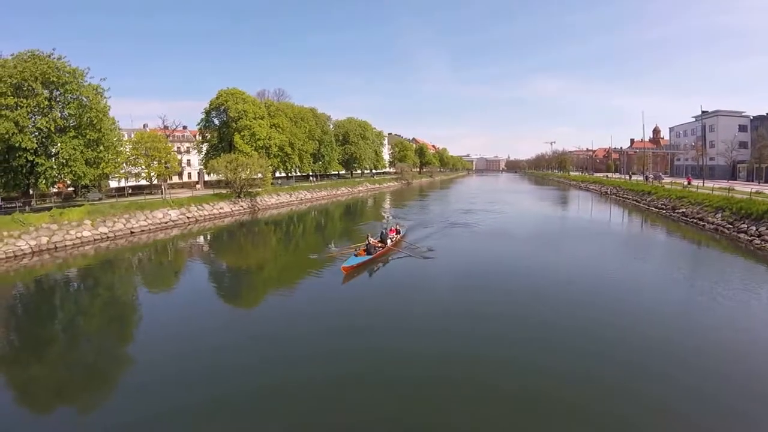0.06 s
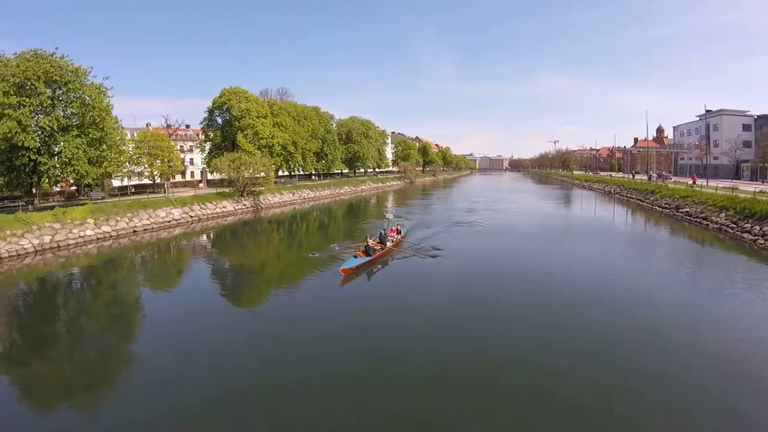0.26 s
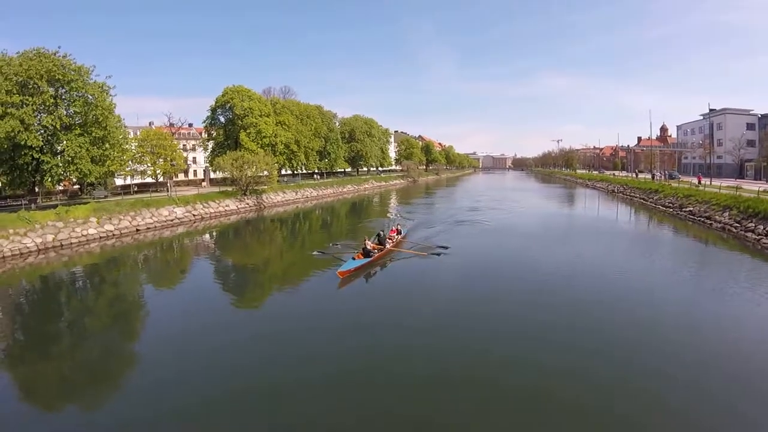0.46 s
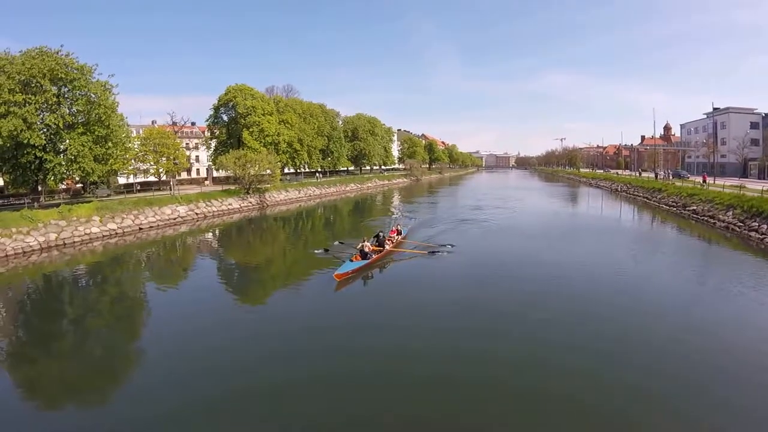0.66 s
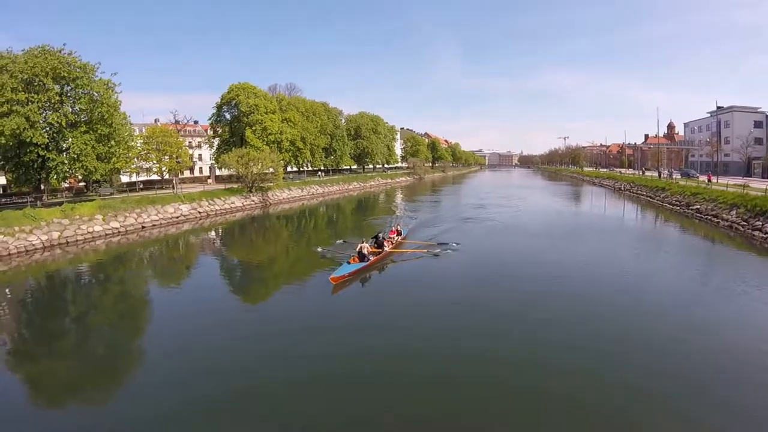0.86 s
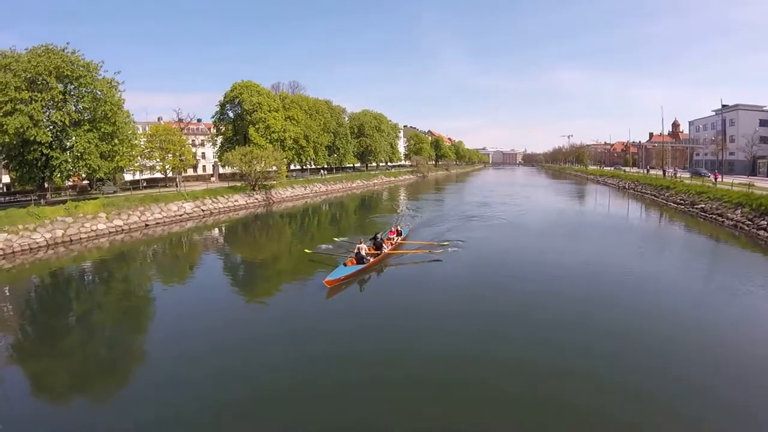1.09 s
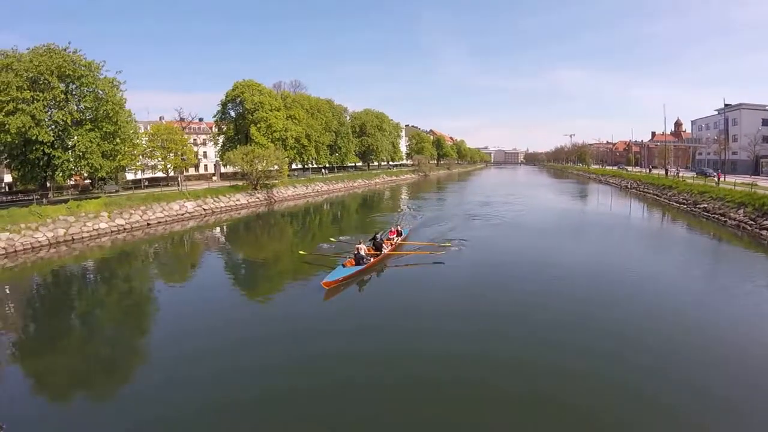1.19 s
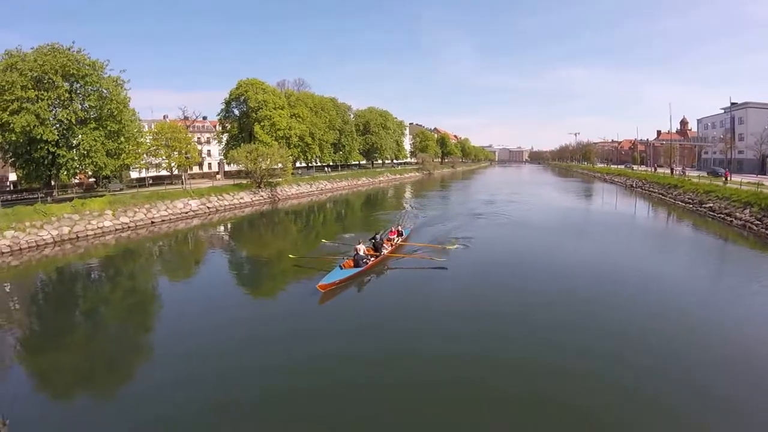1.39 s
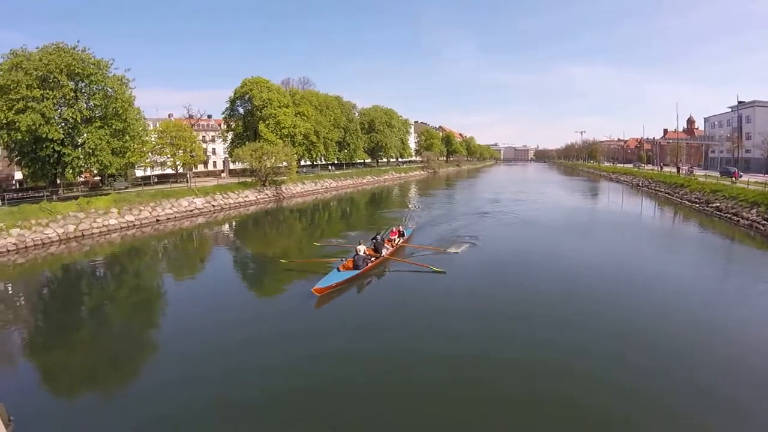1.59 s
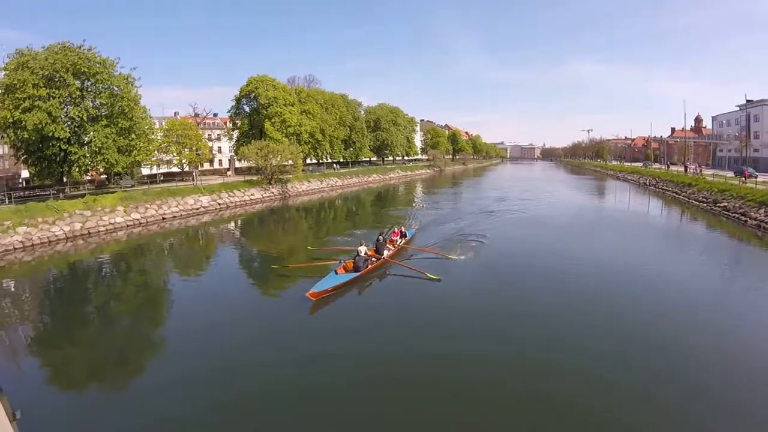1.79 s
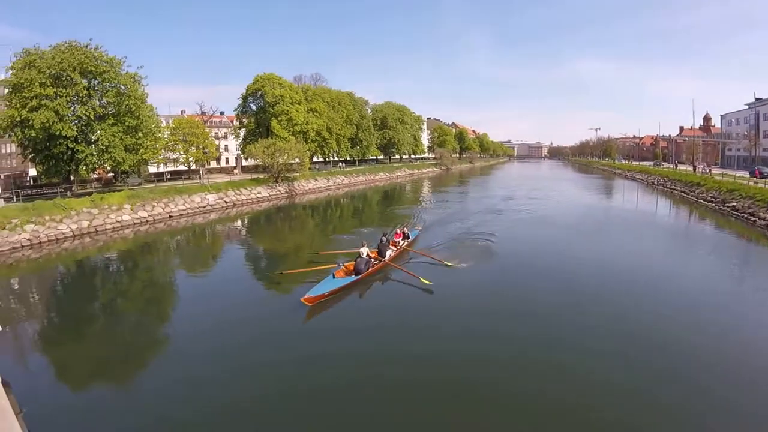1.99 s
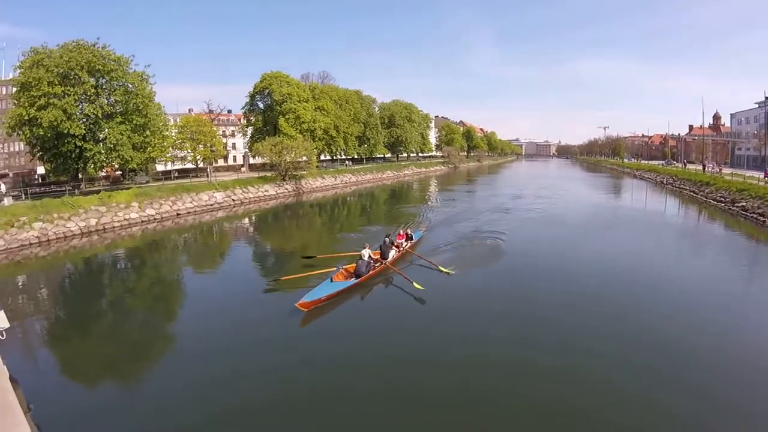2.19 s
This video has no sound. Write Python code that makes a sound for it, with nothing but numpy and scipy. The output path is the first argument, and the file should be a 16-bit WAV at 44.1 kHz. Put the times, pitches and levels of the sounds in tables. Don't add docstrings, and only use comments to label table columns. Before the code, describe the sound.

Rowing strokes heard from a bridge above still water: soft town hum and breeze rumble, one short knock midway, light trickles, then clustered blade slaps with low thuds on the microphone, fading to drips.

```python
import sys
import numpy as np
from scipy import signal
from scipy.fft import rfft, irfft
from scipy.io import wavfile
from scipy.ndimage import uniform_filter1d

SR = 44100
rng = np.random.default_rng(int(sys.argv[2]) if len(sys.argv) > 2 else 0)


def amplitude_ratio(level_db):
    exponent = np.asarray(level_db, float) / 20
    return 10 ** exponent


def wav_out(sig):
    wavfile.write(sys.argv[1], SR, np.round(np.clip(np.atleast_2d(sig).T, -1, 1) * 32767).astype(np.int16))


N = 99225
T = np.arange(N) / SR

# f/Hz, level/dB per Hz
TOWN_SPECTRUM = [(35, -17), (60, -0.5), (178, -11.5), (214, -11.5), (317, -15), (438, -18.5), (1490, -26),
                 (10100, -45.5), (15000, -58.5)]
# f/Hz, width/Hz, share/1
PORT_LIFT = [(1434, 260, 0.48), (3440, 1380, 0.52)]
# f/Hz, level/dB per Hz
BREEZE_SPECTRUM = [(20, 9.5), (35, 0.5), (60, -9), (100, -15.5), (160, -21), (300, -41.5)]
# t/s, level/dB
GUSTS = [(0.0, -54.5), (0.35, -47), (0.434, -47), (0.466, -49.5), (0.636, -49), (0.668, -46), (0.786, -47),
         (0.8, -40), (1.07, -44.5), (1.098, -52), (1.132, -43), (1.68, -44)]
# t/s, level/dB
LATE_GUSTS = [
    (1.95, -43),
    (2.1, -51),
    (2.25, -50.5),
]
# t/s, level/dB, push/s, case thud/dB
RAIL_BUMPS = [
    (0.42, -41, 0.0036, 5),
    (0.615, -37, 0.0075, -3),
    (1.703, -30, 0.0056, 0.5),
    (1.754, -26, 0.0061, -1),
    (1.773, -34, 0.0062, 3),
    (1.792, -25, 0.013, -9),
    (1.818, -28.5, 0.0065, 1.5),
    (1.864, -45, 0.0087, 13),
    (1.881, -38.5, 0.0091, 6),
]
# f/Hz, level/dB, t60/s
MOUNT_MODES = [(44.5, 7.5, 0.064), (97, -14, 0.042)]
# f/Hz, level/dB, t60/s
CASE_MODES = [(150, -17.5, 0.053), (261, -18, 0.039), (315, -21, 0.028)]
# f/Hz, level/dB, t60/s
OARLOCK_MODES = [(1040, -34, 0.015), (1490, -4, 0.017), (1830, -6.5, 0.01), (2256, 0, 0.0072),
                 (2840, -2, .005), (3300, 1.5, .008), (3480, -13, 0.014), (4190, -21, .01)]
# t/s, f/Hz, level/dB, length/s
LONE_DRIPS = [
    (.016, 3250, -67, .008),
    (.156, 3800, -64, .004),
    (.452, 2050, -68, .008),
    (.485, 2060, -65, .012),
    (.797, 1500, -63, .008),
    (2.137, 4250, -64, .005),
]
# f/Hz, width/Hz, level/dB
MIST_BANDS = [(4200, 800, 1.5), (5550, 1700, -0.5), (7800, 2600, -10), (10800, 2300, -14.5)]
# t/s, level/dB, brightness/dB
BLADE_SPRAY = [(1.3, -90, 10), (1.40, -85, -2), (1.425, -65.5, -1), (1.48, -64, 8), (1.5, -79, 12),
               (1.6, -83, 12), (1.74, -74, -18), (1.76, -60, 2), (1.815, -63.5, 4), (1.85, -60, -1),
               (1.92, -57, -3.5), (1.97, -59.5, 0), (2.01, -67, 2), (2.1, -69.5, 6.5), (2.25, -63, -0.5)]
# t/s, level/dB, length/s, brightness/dB
BLADE_SLAPS = [(1.206, -63.5, .008, 0), (1.353, -68, 0.011, 11), (1.479, -60, 0.012, 1),
               (1.507, -63, 0.0065, 5), (1.708, -46, 0.0025, -2.5), (1.7553, -44, 0.0061, -1),
               (1.773, -50, 0.0099, -3), (1.799, -52, 0.0057, 5), (1.8208, -46, 0.0058, -2.5),
               (1.831, -50.5, 0.0055, -7.5), (1.8412, -44, 0.0036, -2), (1.98, -57, 0.0057, 1),
               (2.051, -63.5, 0.0085, 13), (2.062, -62, 0.0044, 6), (2.111, -66.5, 0.014, 14),
               (2.132, -68, .005, 3), (2.156, -67.5, 0.0081, 16), (2.22, -69, 0.011, -7)]
# f/Hz, width/Hz, level/dB
DULL_PORTS = [(1200, 150, -8.5), (1426, 320, 1), (1857, 500, 1.5), (2080, 150, 0.5), (2334, 380, 2)]
# f/Hz, width/Hz, level/dB
BRIGHT_PORTS = [(3060, 850, -3.5), (3376, 530, -0.5), (3960, 570, -13.5), (5160, 300, -12),
                (5570, 1240, -13.5)]


def unit(x):
    return x / np.sqrt(np.mean(x ** 2))


def band(x, f_hz, width_hz):
    return signal.lfilter(*signal.iirpeak(f_hz, f_hz / width_hz, fs=SR), x)


def steep(x, resonances):
    return sum(amplitude_ratio(db) * band(band(x, f_hz, width_hz), f_hz, width_hz) for f_hz, width_hz, db in resonances)


def walk(rate_hz):
    hold = int(SR / rate_hz)
    steps = np.repeat(rng.standard_normal(N // 200), hold)[:N]
    return 1.05 * uniform_filter1d(uniform_filter1d(steps, hold), hold)


def bed(spectrum, lo_hz, count, swell_db, flicker_db, flicker_hz):
    f_hz = np.fft.rfftfreq(N, 1 / SR) + 1
    point_hz, point_db = np.array(spectrum).T
    gain = amplitude_ratio(np.interp(np.log(f_hz), np.log(point_hz), point_db))
    swell = walk(1.97)
    out = 0
    for k in range(count):
        place = 3 * np.log2(f_hz / lo_hz) - k
        window = np.cos(np.pi / 2 * np.clip(place, -1, 1))
        part = irfft(rfft(rng.standard_normal(N)) * gain * window, N)
        out = out + part * amplitude_ratio(swell_db * swell + flicker_db * walk(flicker_hz))
    return unit(out)


def ring(start_s, push_s, modes):
    t = np.maximum(T - start_s, 0)
    force = np.sin(np.pi * np.clip(T[:2000] / push_s, 0, 1))
    free = sum(amplitude_ratio(db) * np.sin(2 * np.pi * f_hz * t) * np.exp(-np.log(1000) * t / t60_s)
               for f_hz, db, t60_s in modes)
    return -signal.oaconvolve(free, force / force.sum())[:N]


def town():
    hum = bed(TOWN_SPECTRUM, 49.92, count=26, swell_db=0.92, flicker_db=0.4, flicker_hz=14.45)
    lift = sum(share * band(hum, f_hz, width_hz) for f_hz, width_hz, share in PORT_LIFT)
    return amplitude_ratio(-55.5) * (hum + lift)


def breeze():
    gust_s, gust_db = np.array(list(GUSTS) + list(LATE_GUSTS)).T
    rumble = bed(BREEZE_SPECTRUM, 19.87, count=13, swell_db=-2.0, flicker_db=3.0, flicker_hz=23)
    return amplitude_ratio(np.interp(T, gust_s, gust_db)) * rumble


def bumps():
    case_late_s, case_push_s = 0.0033, 0.0012
    out = 0
    for t_s, db, push_s, thud_db in RAIL_BUMPS:
        thud = amplitude_ratio(thud_db) * ring(t_s + case_late_s, case_push_s, CASE_MODES)
        out = out + amplitude_ratio(db) * (ring(t_s, push_s, MOUNT_MODES) + thud)
    return out


def oarlock():
    knock = amplitude_ratio(-37.5) * ring(1.0528, 0.00018, OARLOCK_MODES)
    return signal.sosfilt(signal.butter(3, [950, 3900], "band", fs=SR, output="sos"), knock)


def drips():
    glide = 0.015
    out = 0
    for t_s, f_hz, db, length_s in LONE_DRIPS:
        u = np.clip((T - t_s) / length_s, -4, 4)
        cycles = f_hz * length_s * (u + glide * u ** 2 / 2)
        out = out + amplitude_ratio(db) * np.exp(-u ** 2) * np.sin(2 * np.pi * cycles)
    return out


def mist():
    peak_s, rise_s, fall_s, level_db = 1.91, 0.13, 0.091, -66
    u = (T - peak_s) / np.where(T < peak_s, rise_s, fall_s)
    hiss = unit(steep(rng.standard_normal(N), MIST_BANDS))
    return amplitude_ratio(level_db + 1.5 * walk(70)) * np.exp(-np.abs(u) ** 1.1) * hiss


def water():
    drops_per_s = 3300
    drops = unit(rng.standard_normal(N) * (rng.random(N) < drops_per_s / SR))
    spray_s, spray_db, spray_bright_db = np.array(BLADE_SPRAY).T
    flow = amplitude_ratio(np.interp(T, spray_s, spray_db) + 1.2 * walk(90))
    tilt = amplitude_ratio(np.interp(T, spray_s, spray_bright_db) / 2)
    dull = drops * flow / tilt
    bright = drops * flow * tilt
    dense = np.sign(rng.standard_normal(N))
    for t_s, db, length_s, bright_db in BLADE_SLAPS:
        u = (T - t_s) / length_s
        attack = np.clip((T - t_s) / 0.0014, 0, 1)
        slap = attack * np.exp(-np.clip(u, 0, 5) ** 3) * dense * amplitude_ratio(db)
        dull = dull + slap / amplitude_ratio(bright_db / 2)
        bright = bright + slap * amplitude_ratio(bright_db / 2)
    return 4 * (steep(dull, DULL_PORTS) + steep(bright, BRIGHT_PORTS))


def scene():
    background = town() + breeze()
    return (background + bumps() + oarlock() + drips() + mist() + water())[None]


def top_cut(x):
    return signal.sosfilt(signal.butter(12, 15100, fs=SR, output="sos"), x)


def record(dry):
    mix = signal.sosfilt(signal.butter(1, 15, "high", fs=SR, output="sos"), dry)
    return top_cut(mix)


dry = scene()
out = record(dry)
wav_out(out)
```